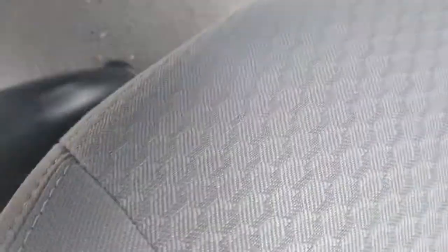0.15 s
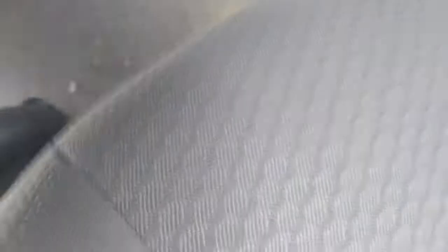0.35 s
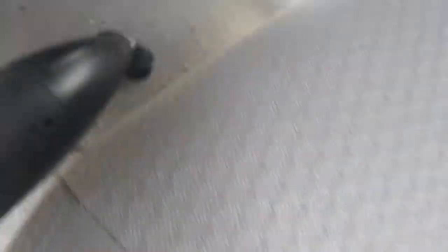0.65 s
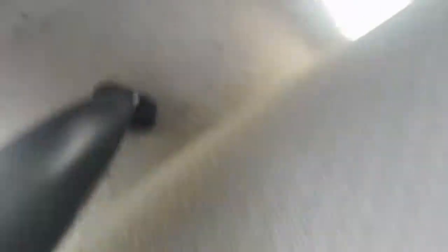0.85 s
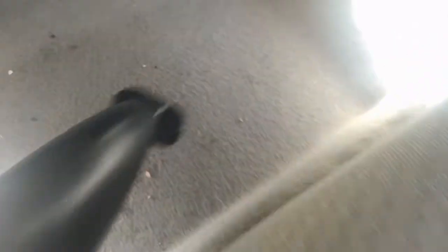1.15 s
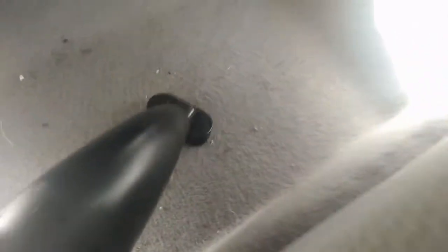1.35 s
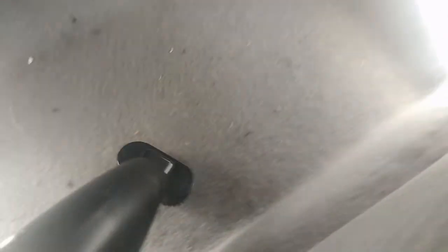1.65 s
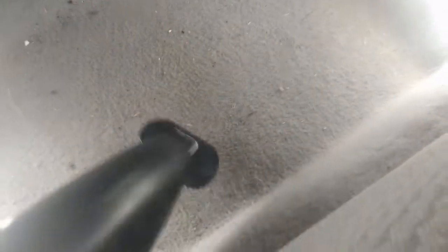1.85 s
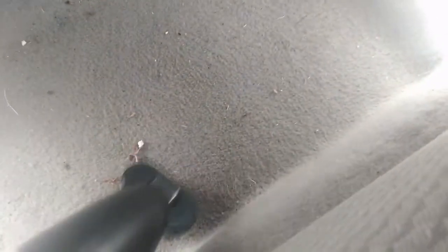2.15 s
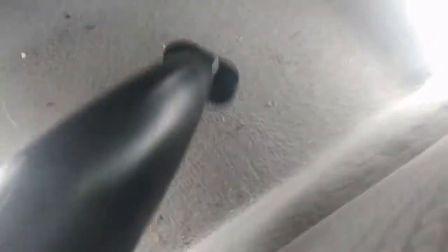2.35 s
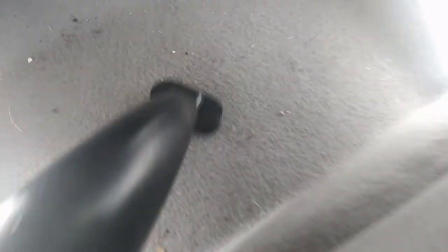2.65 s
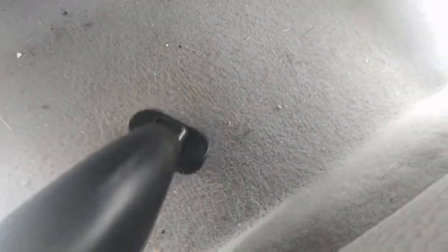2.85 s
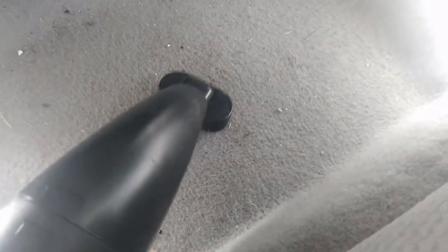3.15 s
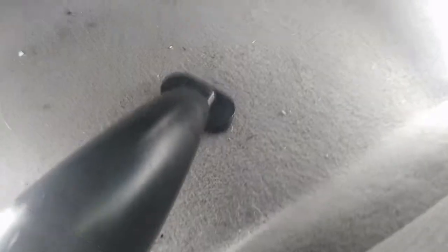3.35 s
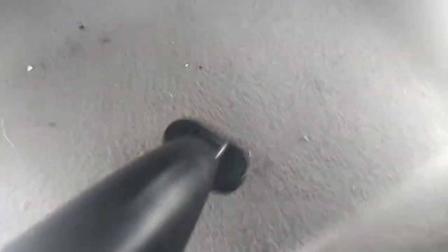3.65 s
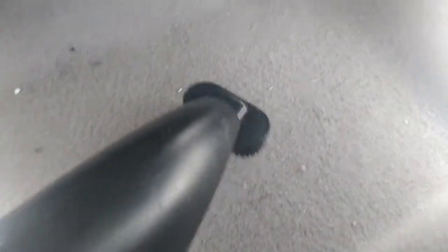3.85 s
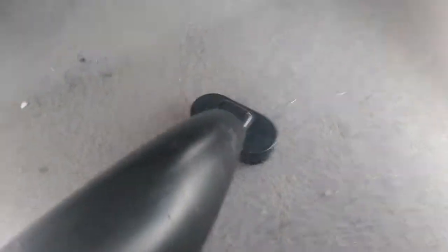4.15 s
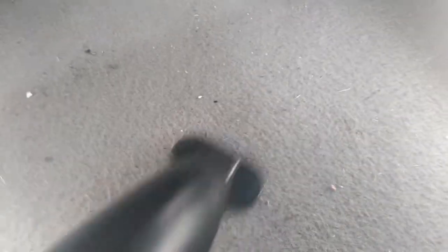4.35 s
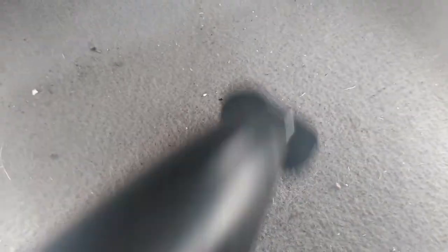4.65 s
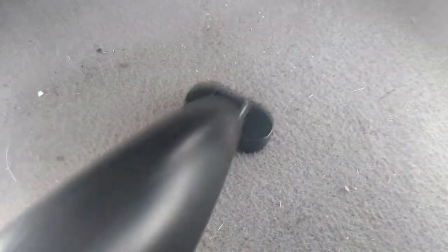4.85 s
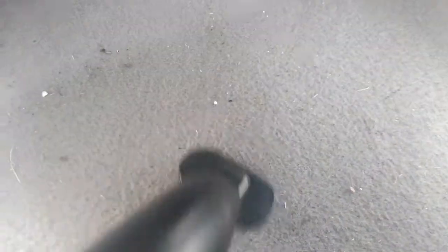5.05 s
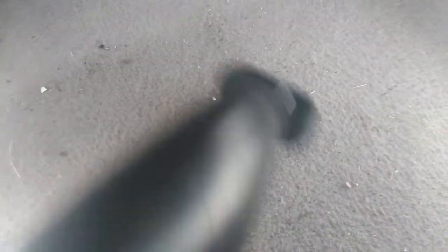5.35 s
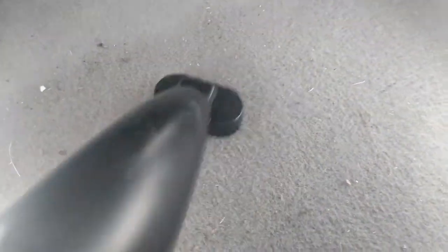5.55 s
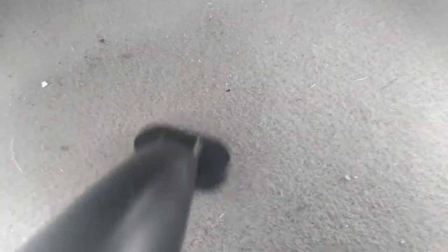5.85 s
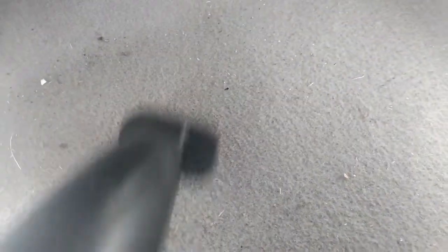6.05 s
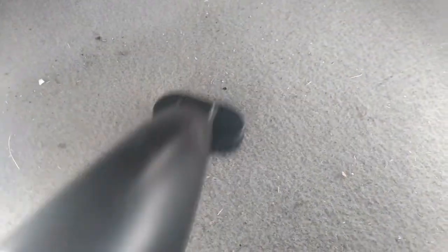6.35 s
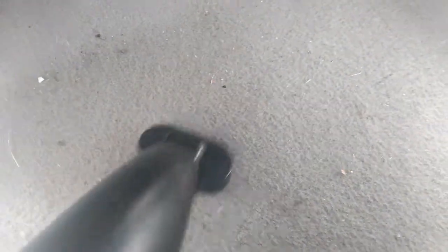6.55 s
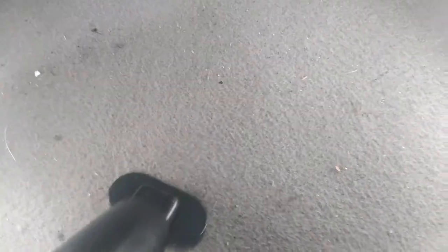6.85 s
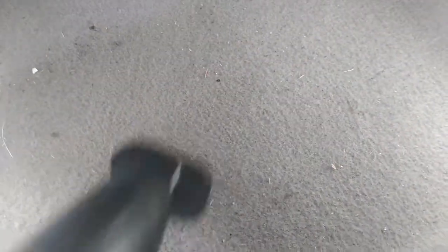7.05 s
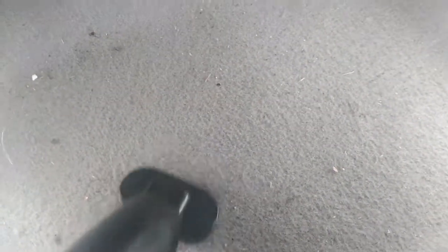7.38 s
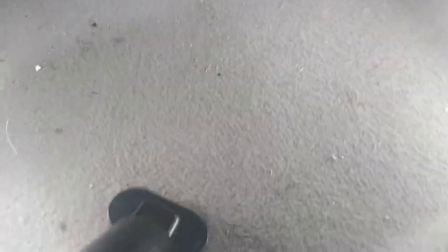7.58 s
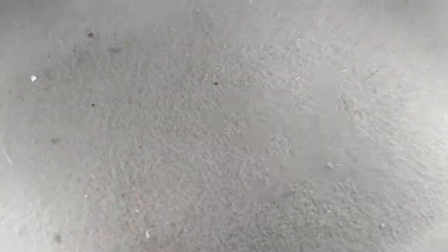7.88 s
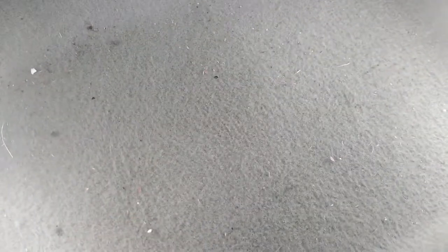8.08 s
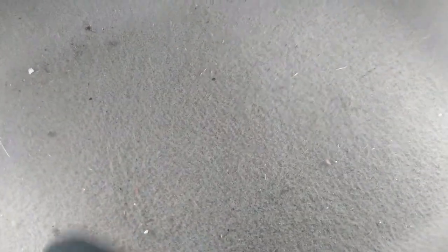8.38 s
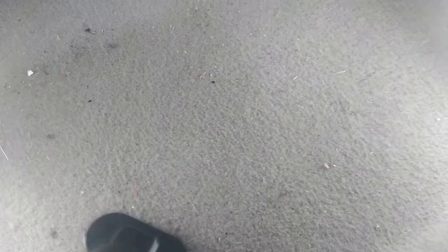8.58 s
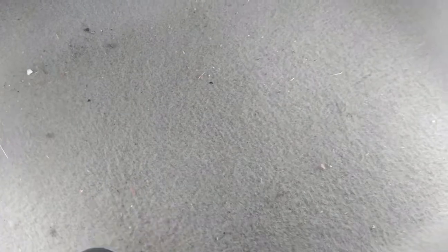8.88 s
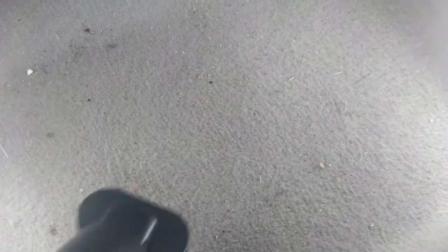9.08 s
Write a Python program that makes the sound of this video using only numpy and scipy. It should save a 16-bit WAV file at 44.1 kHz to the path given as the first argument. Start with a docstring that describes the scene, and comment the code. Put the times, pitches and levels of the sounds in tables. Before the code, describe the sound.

A small handheld vacuum whines and hums steadily with rushing air, its nozzle thudding and rubbing over car carpet amid fine ticking grit.

```python
"""A cordless handheld vacuum works over the carpet of a car's footwell, close to a two-port microphone.
It runs throughout: the motor hums and whines on multiples of one shaft speed, and air rushes through it as noise.
At first the seat half hides the tool and knocks hit the microphone's case, as decaying modes of opposite sign.
Then forward pushes open and swell the sound, landings thud as struck modes, the pile rubs and fine grit ticks.
Towards the end the shaft has slowed a little and the tool is drawn back towards the microphone."""
import sys
import numpy as np
from scipy import signal
from scipy.fft import rfft, irfft
from scipy.io import wavfile
from scipy.ndimage import uniform_filter1d

SR = 44100
rng = np.random.default_rng(int(sys.argv[2]) if len(sys.argv) > 2 else 0)


def generate_wav(sig):
    """Save sig (samples, or channels by samples) to the path in sys.argv[1] as 16-bit PCM at SR."""
    pcm = np.round(np.clip(np.atleast_2d(sig).T, -1, 1) * 32767).astype(np.int16)
    wavfile.write(sys.argv[1], SR, pcm)


N = 406602
T = np.arange(N) / SR
BINS_HZ = np.maximum(np.arange(N // 2 + 1) * SR / N, 1)
TOP_HZ = 14280  # upper edge of the microphone's band

# the two ports: f/Hz, left minus right/dB, coherence/0-1
PORTS = [(49.7, -6, 0.01), (109, 4.5, 0), (252, 7, 0.7), (386, 19, 0.04), (614, 8, 0.63), (1030, 0, 0.93),
         (1280, -1, 0.9), (1510, -6.5, 0.27), (1760, 2.5, 0.8), (2310, 4.5, 0.91), (2410, -0.5, 0.45),
         (3000, 7, 0.47), (3230, -4, 0.66), (3610, 8, 0), (4000, -6.5, 0.74), (5140, -4, 0.9),
         (5250, 11, 0.76), (5730, -6, 0.45), (6570, 6, 1), (6950, 2.5, 0.17), (11600, 12.5, 0.01)]
# the nozzle lands: t/s, thud peak/dB, contact/ms, left minus right/dB, dip of the hum/dB (negative lifts it),
# thock peak/dB
BUMPS = [(0.238, -29, 3.3, 3, 2, -39), (0.347, -44, 3.7, -6, 1.5, -22.5), (.734, -27, 2.8, 5, 3.5, -30),
         (1.394, -30, 2.2, 1, 3, -38), (2.01, -39, 3.3, 2, -2, -42), (2.617, -30, 2.8, 1, 4, -33),
         (3.342, -41, 2, 10, -2.5, -24), (4.893, -22, 1.6, -2, 3, -33), (5.564, -25, 1.4, 0, 2.5, -46),
         (6.358, -23, 2.6, -2, 3, -28), (7.29, -27, 3.5, -3, 4.5, -23.5), (8.094, -43, 1.73, 4, 0.5, -33),
         (8.662, -38, 2.2, -3, 6, -29)]


def undb(db):
    """Decibels to gain."""
    return 10 ** (np.asarray(db) / 20)


def curves(table):
    """Each column of a time table, sample by sample."""
    s, *columns = np.transpose(table)
    return [np.interp(T, s, column) for column in columns]


def across(table, hz):
    """Each column of a frequency table, read on a log axis."""
    f, *columns = np.transpose(table)
    return [np.interp(np.log(hz), np.log(f), column) for column in columns]


def walk(rate):
    """Smooth chance with spread 1 that changes about `rate` times a second."""
    step = max(int(SR / rate), 2)
    steps = np.repeat(rng.standard_normal(N // step + 2), step)
    smooth = uniform_filter1d(uniform_filter1d(steps, step), step)[:N]
    return smooth / smooth.std()


def swells(rows):
    """Sum of smooth swells, each (s, half length s, height)."""
    return sum(height * np.exp(-((T - s) / length) ** 2) for s, length, height in rows)


def pan(db):
    """Left and right gains of constant power for a level difference."""
    gains = undb(np.array([[.5], [-.5]]) * db)
    return gains / np.sqrt(np.mean(gains ** 2, axis=0))


def lead(hz):
    """Phase by which a sound reaches the left port first."""
    # phase lead of the left port: f/Hz, lead/rad
    lead_curve = [(50, 3), (110, 2.6), (240, 0.5), (470, -0.5), (1000, 0), (1420, 0.82), (1600, 2.15),
                  (2000, 2.6), (2500, 3.8), (2850, 5.9), (3250, 6.3), (4200, 9.3), (4600, 9.5),
                  (4900, 12.4), (5700, 12.6), (5900, 15.4), (6750, 15.7), (7100, 18), (14300, 35.5)]
    return np.interp(hz, *np.transpose(lead_curve))


def resonances(table):
    """Gain of steep-sided air resonances, each (Hz, width Hz, dB), added in power."""
    return np.sqrt(sum((undb(db) / (1 + ((BINS_HZ - hz) / width) ** 2 * 2)) ** 2
                       for hz, width, db in table))


def turbulence(gain):
    """Air noise of a given colour, partly shared by the two ports."""
    balance_db, coherence = across(PORTS, BINS_HZ)
    shared = np.sqrt(np.clip(coherence, 0, 1))
    common, left, right = rfft(rng.standard_normal((3, N)))
    arrivals = np.array([common, common * np.exp(-1j * lead(BINS_HZ))])
    ports = np.sqrt(shared) * arrivals + np.sqrt(1 - shared) * np.array([left, right])
    # this scaling lets the gain count as level per Hz
    return irfft(ports * pan(balance_db) * gain * np.sqrt(SR / 2), N)


def tone(angle, lead_rad, balance_db, flutter):
    """One partial of rms 1; turbulence shakes its size and phase, a little differently at each port."""
    common, left, right = (walk(70) + 1j * walk(70) for _ in range(3))
    shake = (common + np.array([left, right])) / np.sqrt(2)
    steady = np.exp(1j * (angle + 2 * np.pi * rng.random()))
    # the last factor keeps the level the same however strong the flutter is
    z = steady * (1 + flutter * shake) * np.sqrt(2 / (1 + 2 * flutter ** 2))
    return pan(balance_db) * np.array([z[0].real, (z[1] * np.exp(-1j * lead_rad)).real])


def ring(modes):
    """A quarter second of decaying modes."""
    t = T[:SR // 4]
    return sum(undb(db - 60 * t / t60) * np.sin(2 * np.pi * hz * t) for hz, db, t60 in modes)


def bend(x, shift):
    """Slide every frequency of a noise by a moving share, by reading it at a varying speed."""
    place = np.cumsum(1 + shift) % (N - 1)
    return np.array([np.interp(place, np.arange(N), channel) for channel in x])


def hand():
    """What the hand does: pushes forward, seals the nozzle on landing, draws back, hides the tool behind the seat."""
    # forward pushes that tip the nozzle open: furthest point t/s, half length/s, opening/0-1
    push_rows = [(0.17, 0.092, 0.4), (0.63, 0.078, 0.67), (1.17, 0.093, 0.9), (1.79, 0.092, 0.3),
                 (2.06, 0.083, 0.6), (2.32, 0.16, 0.75), (3.07, 0.045, 1), (3.31, 0.029, 0.57),
                 (3.78, 0.22, 0.45), (4.68, 0.094, 0.76), (4.98, 0.05, 0.5), (5.38, 0.11, 0.6),
                 (6.23, 0.085, 0.5), (6.66, 0.15, 0.63), (7.25, 0.16, 0.73), (7.65, 0.2, 0.52),
                 (8.6, 0.11, 0.74), (9.19, 0.092, 1)]
    # how far the tool is drawn back towards the microphone: t/s, closeness/0-1
    drawn_back = [(0, 0.35), (3.4, 0), (6.3, 0.65), (7.5, 0.97), (8.1, 0.6), (8.9, 0.76), (9.2, 1)]
    # how closely the seat hides the tool: t/s, closeness/0-1
    seat_cover = [(0, 1), (.55, 0.99), (.8, 0.52), (1.1, 0.6), (1.3, 0)]
    # after a landing the pile seals the nozzle for a moment
    seal_delay_s, seal_half_s = 0.079, 0.11
    seal = swells([(s + seal_delay_s, seal_half_s, 1) for s, *_ in BUMPS])
    return np.array([swells(push_rows), seal, curves(drawn_back)[0], curves(seat_cover)[0]])


def follow(response_db, moves):
    """Level in dB of a sound that follows the moves of the hand."""
    return response_db[0] + np.array(response_db[1:]) @ moves


def motor(moves):
    """Rotor hum, fan overtones and bearing tones, all tied to one slightly unsteady shaft."""
    # shaft speed, sagging with the battery: t/s, turns per second/Hz
    shaft_speed = [(0.0, 474.85), (4.3, 474.95), (4.9, 473.55), (6.2, 473.3), (6.5, 472.85), (7.2, 473.0),
                   (7.8, 472.6), (8.5, 472.55), (8.9, 472.1), (9.2, 472.4)]
    speed = curves(shaft_speed)[0] + .14 * walk(10) + .12 * walk(3)
    angle, mean_hz = 2 * np.pi * np.cumsum(speed) / SR, speed.mean()
    out = hum(angle, mean_hz, moves)
    out += overtones(angle, mean_hz, moves)
    out += fifth_overtone(angle)
    out += faint_overtones(angle, mean_hz, moves[0])
    return out + bearing_tones(angle, mean_hz)


def hum(angle, mean_hz, moves, pan_db=6.5, seat_pan_db=8, waver_db=0.41, dip_s=0.012):
    """The rotor shakes the housing once a turn."""
    # hum and the hand: level/dB, then change/dB for a full push, the seal, drawn back, behind the seat
    hum_response = (-22, 3, -0.2, -0.5, -2)
    # each landing briefly shifts the shaking of the housing, mostly damping it
    dip_db = swells([(s + dip_s / 2, dip_s, db) for s, _, _, _, db, _ in BUMPS])
    # the seat shades the hum from the right port
    partial = tone(angle, lead(mean_hz), pan_db + seat_pan_db * moves[3], flutter=0.058)
    return partial * undb(follow(hum_response, moves) + waver_db * walk(13) - dip_db)


def overtones(angle, mean_hz, moves, waver_db=1.5, swell_waver_db=4.0):
    """Multiples of the shaft speed that follow the hand or swell and fade in the cabin's standing waves."""
    # overtones that follow the hand: multiple, left minus right/dB, flutter share, random fading/dB,
    # response (level/dB, then change/dB for a full push, the seal, drawn back, behind the seat)
    strong = [(7, -2, 0.45, 1.5, (-48.5, -2, -10, -12, 7)), (15, -1, 0.64, 3, (-62.5, 9.5, 5.5, -2.5, -5))]
    # second overtone through the standing waves: t/s, level before gain/dB
    second_level = [(0, -57), (0.12, -41), (0.24, -57), (0.38, -44), (0.48, -49), (0.57, -42), (0.7, -58),
                    (1.0, -63.1), (1.26, -56), (1.45, -40.5), (1.721, -60.9), (2.25, -53), (2.65, -42.5),
                    (3.02, -57), (3.25, -44.5), (3.75, -47), (4.85, -45), (4.98, -38.5), (5.549, -46),
                    (7.7, -47), (7.95, -59), (9.22, -53)]
    # third: t/s, level before gain/dB
    third_level = [(0, -51), (0.9, -49), (1.2, -37), (2.3, -38.5), (3.3, -42), (4.7, -40.5), (6.3, -41),
                   (6.6, -35), (7.6, -34), (8.0, -34.5), (8.6, -34), (8.85, -35), (9.2, -33.5)]
    # fourth: t/s, level before gain/dB
    fourth_level = [(0, -40), (0.22, -41), (0.4, -29), (0.6, -45), (1.0, -30), (1.2, -38), (1.55, -30),
                    (1.9, -40), (2.04, -31), (2.241, -40), (2.7, -33.5), (4.9, -30.5), (7.2, -30.5),
                    (8.2, -26), (8.48, -38.5), (8.661, -28), (8.9, -25.5), (9.22, -38)]
    # sixth: t/s, level before gain/dB
    sixth_level = [(0, -54), (0.8, -54), (1.0, -39), (1.3, -52), (1.85, -51), (2.05, -46.5), (2.7, -42.5),
                   (3.1, -44), (3.6, -41.5), (4.1, -48), (5.2, -50), (5.4, -42), (5.7, -51), (7.6, -48.5),
                   (7.85, -45), (8.2, -45), (8.5, -38), (8.85, -47), (9.15, -39.5)]
    # eighth: t/s, level before gain/dB
    eighth_level = [(0, -56), (0.9, -53), (1.4, -61), (1.7, -45), (2.3, -43), (2.6, -56), (4.0, -47),
                    (4.4, -45), (6.3, -44.5), (6.8, -43.5), (7.6, -43), (8.4, -41.5), (9.2, -45)]
    # ninth, from the fan blades: t/s, level before gain/dB
    blade_level = [(0, -38.5), (0.44, -42.5), (0.56, -37), (0.7, -53), (0.85, -34.5), (1.02, -55),
                   (1.22, -46), (1.38, -66), (1.62, -47), (1.8, -37), (2.3, -35.5), (2.42, -46),
                   (2.698, -40), (3.45, -41), (3.65, -41.5), (3.95, -31.5), (4.398, -36.5), (5.5, -35),
                   (5.75, -36), (9.22, -41.5)]
    # twelfth: t/s, level before gain/dB
    twelfth_level = [(0.1, -52.5), (0.7, -52.5), (0.95, -63), (1.35, -52), (1.9, -66), (2.5, -58),
                     (3.2, -58), (3.8, -65), (4.6, -58), (4.95, -55), (5.2, -63), (5.6, -54.5), (6.35, -54),
                     (6.55, -58), (6.8, -59), (7.4, -58), (7.8, -69), (8.3, -59), (8.75, -68), (9.2, -59)]
    # eighteenth: t/s, level before gain/dB
    eighteenth_level = [(0, -62), (1.2, -61), (1.8, -64), (3.1, -56), (3.6, -60), (4.55, -52), (4.85, -59),
                        (5.2, -52), (6.0, -55), (7.3, -60), (8.2, -64), (8.9, -61), (9.15, -54)]
    # multiple, left minus right/dB, flutter share, gain/dB, level curve
    swelling = [(2, 0, 0.1, 0, second_level), (3, -3.5, 0.2, 0.5, third_level),
                (4, 2, 0.086, 1.5, fourth_level), (6, 6, 0.29, 0, sixth_level),
                (8, 5, 0.45, 0.5, eighth_level), (9, 4.5, 0.13, 3, blade_level),
                (12, -3, 0.3, 2, twelfth_level), (18, 4.5, 0.38, 2.5, eighteenth_level)]

    def overtone(k, balance_db, flutter, db):
        """One multiple of the shaft speed, wavering a little in level."""
        return tone(k * angle, lead(k * mean_hz), balance_db, flutter) * undb(db + waver_db * walk(22))

    out = np.zeros((2, N))
    for k, balance_db, flutter, fade_db, response_db in strong:
        out += overtone(k, balance_db, flutter, follow(response_db, moves) + fade_db * walk(7))
    for k, balance_db, flutter, gain_db, level in swelling:
        level_db = gain_db + curves(level)[0] + swell_waver_db * flutter * walk(14)
        out += overtone(k, balance_db, flutter, level_db)
    return out


def fifth_overtone(angle, level_db=-48, pan_db=1, lead_rad=-1.7, waver_db=1.5):
    """The fifth multiple of the shaft speed stays low between brief surges."""
    # surges: t/s, added level/dB, half length/s
    surges = [(0.502, 6, 0.1), (0.713, 14, 0.12), (1.14, 3, 0.05), (2.438, 10, 0.08), (3.716, 11, 0.08),
              (4.582, 10, 0.044), (4.75, 15, 0.045), (5.417, 15.6, 0.054), (6.08, 11, 0.12),
              (6.72, 11, 0.084), (7.147, 16, 0.075), (8.41, 16, 0.06), (8.52, 13.5, 0.053)]
    surge_db = swells([(s, length, db) for s, db, length in surges])
    partial = tone(5 * angle, lead_rad, pan_db, flutter=.22)
    return partial * undb(level_db + surge_db + waver_db * walk(22))


def faint_overtones(angle, mean_hz, push, offset_db=-1, push_db=12.0, fading_db=4.5):
    """High multiples of the shaft speed that fade at random and rise with each push."""
    # faint overtones: multiple, level before offset/dB
    faint = [(17, -66), (20, -70), (21, -67), (24, -69)]
    out = np.zeros((2, N))
    for k, db in faint:
        hz = k * mean_hz
        partial = tone(k * angle, lead(hz), across(PORTS, hz)[0], flutter=0.27)
        out += partial * undb(db + offset_db + push_db * push + fading_db * walk(2.92))
    return out


def bearing_tones(angle, mean_hz):
    """Bearing tones lie between the multiples and keep a fixed ratio to the shaft."""
    # bearing tones: f at mean speed/Hz, level/dB, left minus right/dB
    bearing = [(766.7, -47, 2), (1558, -48.5, -1), (1800, -63, 9), (2730, -48, 0)]
    out = np.zeros((2, N))
    for hz, db, balance_db in bearing:
        out += tone(angle * hz / mean_hz, lead(hz), balance_db, flutter=0.086) * undb(db)
    return out


def airflow(moves, suction):
    """Turbulent air excites the nozzle, bin, slots and vents and echoes off the carpet, over a broad rush."""
    air = mouth() + nozzle_air(moves) + bin_air(moves, suction) + slot_air() + vent_air(moves)
    air += gap_air(moves[3])
    return carpet_echo(air, moves[0]) + rush(moves)


def mouth(centre_hz=1270, width_hz=70, wander=0.018):
    """A breathy whistle at the nozzle's mouth; it slides and swells as the gap to the floor changes."""
    # whistling resonance of the mouth: t/s, f/Hz, level/dB per Hz
    mouth_path = [(0, 1290, -67), (0.17, 1170, -53), (0.27, 1228, -58), (0.45, 1200, -63),
                  (0.59, 1164, -54), (0.75, 1290, -54.5), (0.9, 1330, -60), (1.17, 1232, -56),
                  (1.4, 1340, -59), (2.0, 1302, -64), (2.32, 1253, -54), (2.5, 1318, -64),
                  (4.3, 1328, -63.5), (4.65, 1240, -58), (4.9, 1330, -65), (6.2, 1292, -56),
                  (6.5, 1330, -63), (8.3, 1313, -61), (9.2, 1293, -55)]
    hz, db = curves(mouth_path)
    whistle = turbulence(resonances([(centre_hz, width_hz, 0)]))
    return bend(whistle, hz / centre_hz - 1 + wander * walk(8)) * undb(db)


def nozzle_air(moves):
    """Narrow air resonances of the nozzle, stronger when a push opens it."""
    # nozzle resonances: f/Hz, width/Hz, level before the hand's response/dB per Hz
    nozzle_modes = [(1249, 24, -55), (1388.6, 22, -52)]
    # nozzle and the hand: offset/dB, then change/dB for a full push, the seal, drawn back, behind the seat
    nozzle_response = (0, 6.5, -3.5, 2.5, -4.5)
    return turbulence(resonances(nozzle_modes)) * undb(follow(nozzle_response, moves) + walk(17))


def bin_air(moves, suction):
    """Air resonances of the bin, wandering in pitch and rising as the tool is drawn back."""
    # bin resonances: f/Hz, width/Hz, level before the hand's response/dB per Hz
    bin_modes = [(1713, 110, -65.5), (2311, 136, -59.5), (2867, 70, -66.5)]
    # bin and the hand: offset/dB, then change/dB for a full push, the seal, drawn back, behind the seat
    bin_response = (-0.5, 1, 0, 6, 1)
    air = bend(turbulence(resonances(bin_modes)), 0.012 * walk(5))
    return air * undb(follow(bin_response, moves) + 0.14 * suction + walk(16))


def slot_air(offset_db=0.9):
    """Air resonances of the exhaust slots, wandering in pitch and level."""
    # slot resonances: f/Hz, width/Hz, level before the slow curve and offset/dB per Hz
    slot_modes = [(3486, 137, -70), (3767, 150, -68), (3910, 81, -69), (4430, 360, -96), (5210, 89, -76)]
    # slow level of the slots' rush, used relative to its mean: t/s, level/dB
    slot_level = [(0.0, -44), (1.0, -42.5), (1.2, -38.5), (1.33, -44.5), (1.71, -42.5), (2.28, -43.5),
                  (2.51, -43), (4.74, -42), (4.82, -42), (4.97, -39.5), (5.66, -47.5), (5.71, -40.5),
                  (9.05, -45), (9.2, -37.5)]
    level_db = curves(slot_level)[0]
    air = bend(turbulence(resonances(slot_modes)), 0.009 * walk(6))
    return air * undb(offset_db + level_db - level_db.mean() + walk(9))


def vent_air(moves):
    """Broad exhaust noise from the vents."""
    # colour of the vents: f/Hz, level before the hand's response/dB per Hz
    vent_colour = [(700, -87.5), (1350, -59.5), (1600, -62), (1900, -61.5), (2120, -68), (2450, -65.5),
                   (2650, -72.5), (3100, -74), (3700, -76), (4100, -81), (4450, -76.5), (4850, -91),
                   (6500, -102), (9000, -110)]
    # vents and the hand: offset/dB, then change/dB for a full push, the seal, drawn back, behind the seat
    vent_response = (-0.5, 1.5, 0.5, -1.5, -1)
    air = turbulence(undb(across(vent_colour, BINS_HZ)[0]))
    return air * undb(follow(vent_response, moves) + walk(14))


def gap_air(seat):
    """The narrow gap beside the seat resonates while the tool is behind it."""
    # gap resonances when fully hidden: f/Hz, width/Hz, level/dB per Hz
    gap_modes = [(2250, 280, -62), (2570, 95, -61)]
    return turbulence(resonances(gap_modes)) * seat


def carpet_echo(x, push, share=0.31, lag_ms=1.123, push_ms=0.027, sway_ms=0.073):
    """A reflection off the floor whose path changes as the hand moves, so the colour wanders."""
    late = T - (lag_ms + push_ms * push + sway_ms * walk(5)) / 1000
    echo = np.array([np.interp(late, T, channel) for channel in x])
    return (x + share * echo) / np.hypot(1, share)


def rush(moves):
    """The broad low rush of turbulent air."""
    # colour of the rush: f/Hz, level before the hand's response/dB per Hz
    rush_colour = [(20, -75), (40, -73), (62, -78.5), (100, -71.5), (150, -71.5), (250, -68), (350, -63),
                   (450, -62.5), (520, -64), (600, -71), (720, -66.5), (880, -72), (1200, -69),
                   (2500, -105)]
    # rush and the hand: offset/dB, then change/dB for a full push, the seal, drawn back, behind the seat
    rush_response = (-2.5, 1, 0.8, 2, 0.058)
    air = turbulence(undb(across(rush_colour, BINS_HZ)[0]))
    return air * undb(follow(rush_response, moves) + 1.56 * walk(14))


def hiss(suction, low_db, flicker_db=1.0, split_hz=9000):
    """Air drawn through the pile; its lower part grows and shrinks against the rest."""
    # colour of the suction hiss: f/Hz, level before the slow curve/dB per Hz
    hiss_colour = [(3000, -100), (5600, -92.5), (6100, -83), (6550, -84), (7000, -82.5), (8300, -84),
                   (9500, -83), (10700, -81), (12400, -83.5), (13100, -87.5), (14300, -86.5)]
    colour = undb(across(hiss_colour, BINS_HZ)[0])
    low_share = 1 / (1 + (BINS_HZ / split_hz) ** 12)
    low = turbulence(colour * np.sqrt(low_share)) * undb(low_db)
    high = turbulence(colour * np.sqrt(1 - low_share))
    return shifting(low + high) * undb(suction + flicker_db * walk(22))


def shifting(x, shift_db=1.0, rate=4.0, count=7):
    """The colour of a hiss drifts: overlapping bands swell and fade slowly, each on its own."""
    centres = np.linspace(6000, TOP_HZ, count)
    spectrum = rfft(x)
    out = np.zeros((2, N))
    for band in np.eye(count):
        part = irfft(spectrum * np.interp(BINS_HZ, centres, band), N)
        out += part * undb(shift_db * walk(rate))
    return out


def bumps(knock_db=-7.5):
    """The nozzle knocks and pushes the floor pan through the carpet; a longer contact gives a duller thud."""
    # carpeted floor pan: f/Hz, level/dB, t60/s
    floor_modes = [(95, 7.5, 0.16), (137, 7, 0.11), (176, -3, 0.05), (301, 13, 0.074)]
    # plastic nozzle: f/Hz, level before the contact's share/dB, t60/s
    knock_modes = [(385, -10, 0.065), (590, -10, .04), (709, -0.5, 0.064), (870, 0, 0.044)]
    # hollow body of the tool, relative levels: f/Hz, level/dB, t60/s
    thock_modes = [(179, 10, 0.02), (265, -3, 0.018)]
    out, floor, knock, thock = np.zeros((2, N)), ring(floor_modes), ring(knock_modes), ring(thock_modes)
    thock /= np.abs(thock).max()
    ms = 1000 * T[:SR // 50]
    for s, db, contact_ms, pan_db, _, thock_db in BUMPS:
        press = np.sin(np.pi * np.minimum(ms / contact_ms, 1)) ** 2
        thud = signal.fftconvolve(press, floor)[:len(floor)]
        # a shorter contact also knocks the plastic harder
        blow = thud / np.abs(thud).max() + undb(knock_db) * (2 / contact_ms) * knock
        i = int(s * SR)
        out[:, i:i + len(blow)] += pan(pan_db) * (undb(db) * blow + undb(thock_db) * thock)
    return out


def scuffs(hz=285, width_hz=95, judder_db=2):
    """The dragged nozzle judders on the pile and makes the tube murmur."""
    # drags over the pile: t/s, level/dB, half length/s
    drags = [(0.335, -39, 0.034), (0.88, -36.5, 0.064), (1.537, -41.5, 0.088), (2.152, -41.5, 0.054),
             (2.773, -45, 0.075), (3.33, -45, 0.044), (3.524, -45, 0.075), (5.059, -40, .04),
             (5.167, -40, 0.048), (6.629, -39.5, 0.14), (6.885, -39, 0.035), (7.303, -49, 0.043),
             (7.41, -44, 0.025)]
    rub = turbulence(resonances([(hz, width_hz, 0)]))
    strokes = swells([(s, length, undb(db)) for s, db, length in drags])
    return rub / rub.std() * strokes * undb(judder_db * walk(50))


def grit(suction, size_db=-59, pan_db=9):
    """Fine grains tick densely against the plastic tube, more of them as the suction hiss rises."""
    # ringing of the tube: f/Hz, level before the grain's size/dB, t60/s
    tube_modes = [(2390, 0, 0.0077), (3950, -8, 0.0053), (7440, -14, 0.0092), (9480, 10.5, 0.0041),
                  (10900, 9, 0.0027), (12900, 1, .002)]
    per_second = 420 * undb(2 * suction)
    hit = rng.random(N) < per_second / SR
    # grain sizes spread over 6 dB, with either sign
    sizes = undb(np.minimum(2 * rng.exponential(size=N), 6)) * rng.choice([-1, 1], N)
    ticks = signal.fftconvolve(hit * sizes, ring(tube_modes))[:N]
    return pan(pan_db) * undb(size_db) * ticks


def taps():
    """Knocks on the microphone's case push one port and pull the other."""
    # knocks: t/s, peak/dB, left minus right/dB
    tap_rows = [(0.235, -25, 7), (0.333, -25, 1), (0.346, -13, 0), (0.363, -24, 0)]
    # ringing of the case, relative levels: f/Hz, level/dB, t60/s
    case_modes = [(140, 3, 0.022), (230, -3, 0.016)]
    out, case = np.zeros((2, N)), ring(case_modes)
    case /= np.abs(case).max()
    for s, db, pan_db in tap_rows:
        i = int(s * SR)
        out[:, i:i + len(case)] += pan(pan_db) * np.array([[-1], [1]]) * undb(db) * case
    return out


def scene():
    """The running vacuum and what it touches."""
    # slow change of the suction hiss: t/s, level/dB, extra level of its lower part/dB
    hiss_level = [(0, 2, -0.5), (0.6, 3.5, -0.5), (0.85, 0.5, 2.5), (1.15, 2.5, 2), (1.45, -4, 5),
                  (1.8, 2, -0.5), (2.25, 1.5, -2), (2.45, -1, 0), (3.0, -1, 1.5), (3.5, -3, 4),
                  (3.72, 2.5, -3), (4.0, -2.5, 2), (4.7, 2.5, -2.5), (4.9, 0.5, -0.5), (5.4, 3, -2.5),
                  (5.65, -0.5, 0), (6.0, 1.5, -0.5), (6.4, 0.5, -2), (6.7, 1, 1.5), (7.5, 0.8, 0),
                  (8.25, -5, -0.5), (8.6, -1.5, -1), (8.9, -3, 0.5), (9.2, -0.5, -4)]
    moves = hand()
    suction, low_db = curves(hiss_level)
    machine = motor(moves) + airflow(moves, suction) + hiss(suction, low_db)
    return machine + bumps() + scuffs() + grit(suction) + taps()


def record(dry, low_cut_hz=66):
    """The recorder drops the deepest bass and cuts the top steeply."""
    low_cut = signal.butter(3, low_cut_hz, "high", fs=SR, output="sos")
    top_cut = signal.ellip(12, .1, 80, TOP_HZ, fs=SR, output="sos")
    return signal.sosfilt(top_cut, signal.sosfilt(low_cut, dry))


dry = scene()
out = record(dry)
generate_wav(out)
```